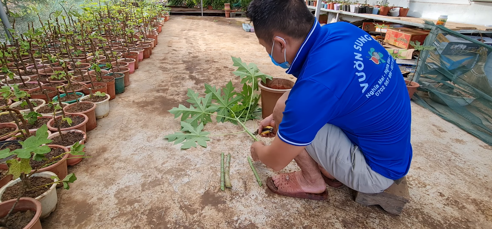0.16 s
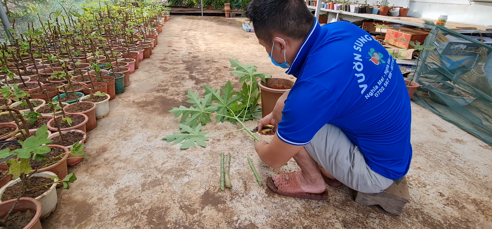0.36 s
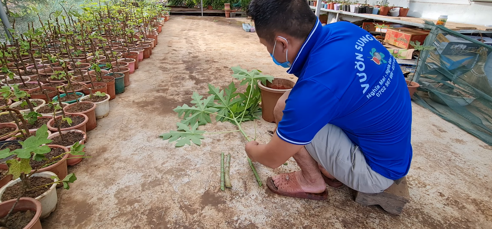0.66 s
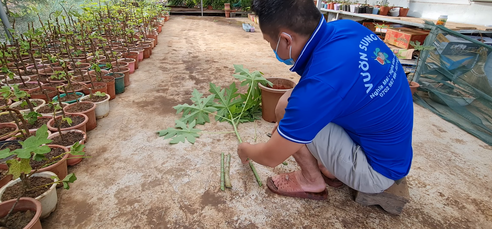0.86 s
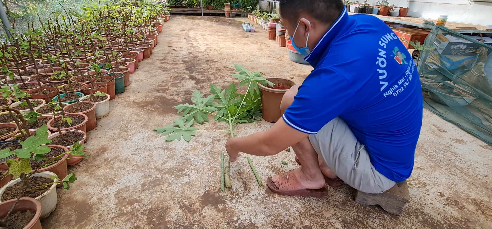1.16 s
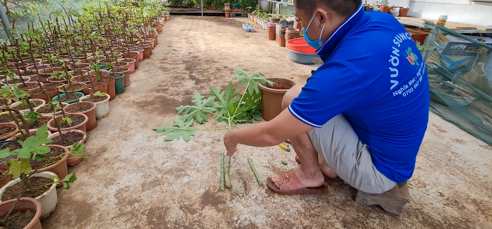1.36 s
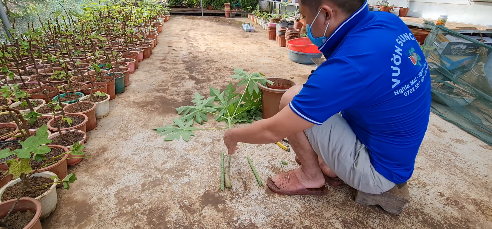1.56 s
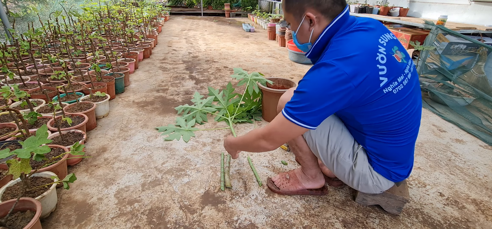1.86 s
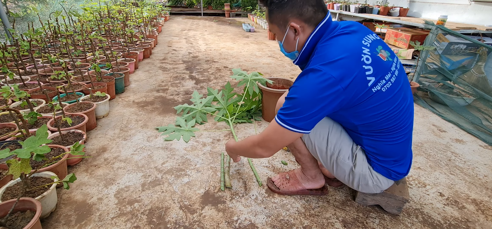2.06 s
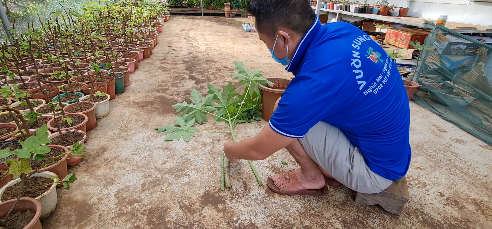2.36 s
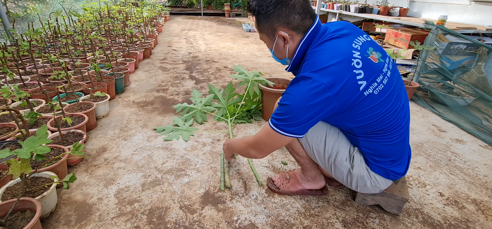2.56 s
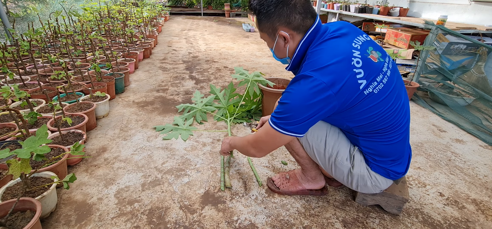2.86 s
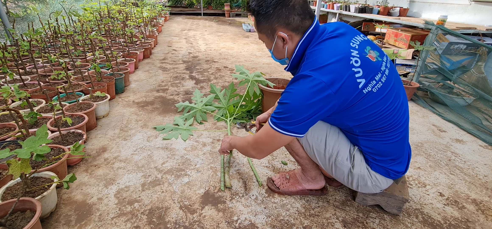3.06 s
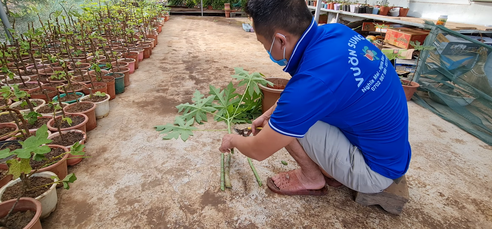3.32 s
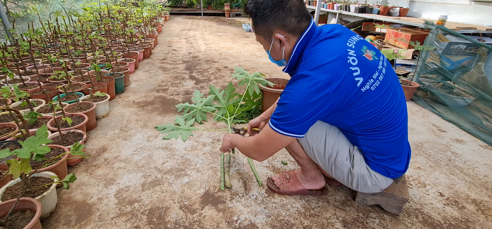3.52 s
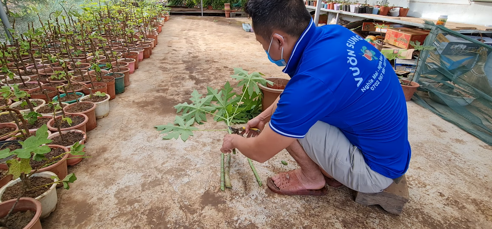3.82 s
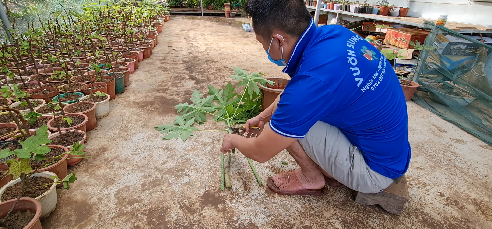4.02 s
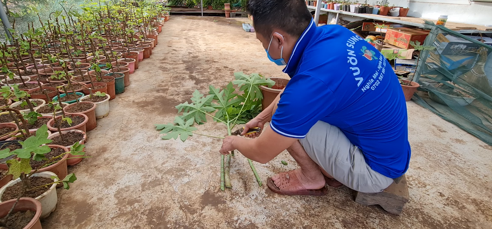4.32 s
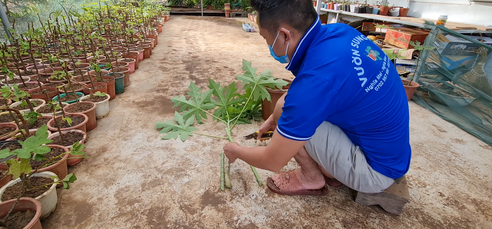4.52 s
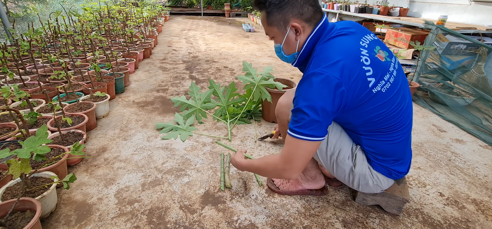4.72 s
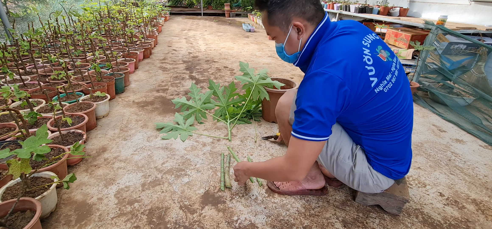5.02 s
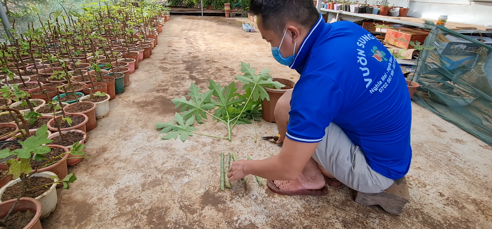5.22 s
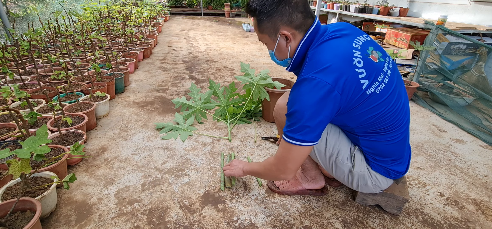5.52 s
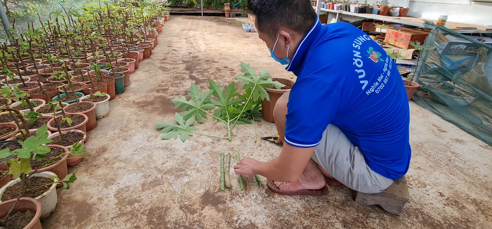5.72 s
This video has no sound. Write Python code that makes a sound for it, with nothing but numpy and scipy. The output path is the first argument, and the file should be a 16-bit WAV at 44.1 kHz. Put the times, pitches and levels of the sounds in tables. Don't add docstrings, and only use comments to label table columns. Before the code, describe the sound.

Pruning shears clatter onto concrete, light metallic ticks and stem rustles follow, then one sharp snip cuts a green stem amid quiet nursery ambience.

```python
import sys
import numpy as np
from scipy import signal
from scipy.fft import irfft
from scipy.io import wavfile
from scipy.ndimage import uniform_filter1d

SR = 44100
rng = np.random.default_rng(int(sys.argv[2]) if len(sys.argv) > 2 else 0)


def ratio(d):
    e = np.asarray(d, float) / 20
    return 10 ** e


def store_wav(level_fs):
    pcm = np.round(np.clip(np.atleast_2d(level_fs), -1, 1) * 32767)
    wavfile.write(sys.argv[1], SR, pcm.T.astype(np.int16))


N = 259308

# start in seconds, peak in dB, rise in seconds, crack in dB, room in dB.
BOUNCES = [
    (0.734, -31, 0.002, -8, 0),
    (0.771, -13.5, 0.0019, -7, 0.5),
    (0.827, -9, 0.002, -6.5, -2),
    (0.921, -16.5, 0.002, -3, -0.5),
]
# frequency in Hz, level in dB per Hz.
BOUNCE_COLOURS = [
    [(120, -42), (200, -8.5), (1040, -13.5), (1370, -8), (1940, -10), (2750, -3), (3760, -17), (4770, -9.5),
     (8270, -16.5), (16000, -33.5)],
    [(120, -55.5), (200, -31.5), (311, -14.5), (548, -20), (671, -9), (1020, -16), (1980, -11.5),
     (2960, 1.5), (3490, -14.5), (5420, -3.5), (7270, -15.5), (12400, -23.5), (16000, -42.5)],
    [(71, -46.5), (120, -18.5), (295, -15), (362, -18.5), (546, -27.5), (742, -4.5), (856, -7.5),
     (1140, -2.5), (1940, -7.5), (3310, -8), (3740, -14), (4140, -13), (7500, -20), (12300, -25),
     (16000, -30.5)],
    [(88, -50.5), (150, -36), (309, -8.5), (398, -23), (774, -0.5), (1480, -7), (1600, 0), (2270, -11),
     (2760, -7), (3770, -19.5), (7180, -12.5), (9260, -22.5), (16000, -25.5)],
]
# start in seconds, peak in dB, rise in seconds, room in dB.
SNIP_EVENT = (4.2694, -2.5, .0019, -2.5)
# frequency in Hz, level in dB per Hz.
SNIP_COLOUR = [(59, -56), (100, -26), (550, -22), (918, -26.5), (1380, -11.5), (1700, -26), (1850, -11),
               (2200, -11.5), (2900, 1), (4080, -9.5), (4440, 2.5), (5860, 2), (9980, -16), (15000, -11),
               (16300, -16)]
# frequency in Hz, decay t60 in seconds, level in dB.
BLADE_RINGS = [(4400, .0045, 2.0), (6000, .012, -3.5)]
# time in seconds, level in dB.
CRUSH_LEVEL = [
    (4.205, -72.5),
    (4.217, -55.5),
    (4.23, -44),
    (4.255, -43),
    (4.262, -51),
    (4.268, -37),
]
# frequency in Hz, level in dB per Hz.
FIBRE_COLOUR = [(180, -58), (300, -28), (967, -7.5), (1100, -6), (1450, -7), (1620, -6), (3070, -2.5),
                (4130, -12), (6490, -10), (12500, -31), (16200, -52), (22000, -120)]
# start in seconds, peak in dB, strongest ring in Hz,
# thump share in dB, fizz share in dB.
LIGHT_TAPS = [(1.65, -68, 520, 2, -16), (1.933, -54.5, 1200, -10, -36), (2.07, -58.5, 1210, -3, -25),
              (2.155, -44, 2800, -4, -31), (2.228, -54, 4600, -14, -10), (2.251, -43, 1200, 1, -23),
              (2.308, -54, 770, 0, -19), (2.367, -38, 3500, -26, -8), (2.547, -31, 1900, -21, -20),
              (2.575, -32, 6610, -40, -17), (2.771, -55, 3450, -31, -26), (2.999, -60, 4720, -10, -16),
              (3.605, -47, 1520, -6, -16.5), (4.216, -38, 2200, -18, -30), (4.473, -42, 3100, -38.5, -3),
              (4.777, -48, 1700, -25, -22), (4.789, -51, 6160, -15, -16), (4.822, -47, 1590, -29, -18)]
# frequency in Hz, decay t60 in seconds, level in dB.
STEEL_RINGS = [(800, 0.024, -4), (1200, .012, -7.5), (1700, .01, 0), (2960, 0.004, 0.5), (4300, .008, -3),
               (6360, 0.0047, 1.5)]
# start in seconds, length in seconds, peak in dB,
# centre in Hz, hiss share in dB.
STROKES = [(0.0, .045, -65, 2200, -1), (.09, .2, -76, 950, 2), (.29, .11, -72, 1500, -2),
           (.435, .17, -63, 1700, -2), (.55, .2, -69, 2100, 3), (1.095, .26, -53, 1500, -20),
           (1.3, .2, -88, 1250, 12), (1.62, .2, -75, 800, -14), (1.82, .16, -80, 1200, 3),
           (2.01, .12, -73, 850, -12), (2.11, .2, -66, 950, -22), (2.19, .13, -72, 1040, 5),
           (2.32, .05, -70, 1050, 2), (2.96, .16, -74, 1135, -9), (4.77, .15, -74, 1560, -14)]
# start in seconds, peak in dB, pitch in Hz.
STEM_LANDINGS = [
    (2.18, -58, 340),
    (4.584, -48.5, 315),
    (5.59, -61.5, 250),
    (5.643, -54, 480),
    (5.701, -59, 600),
    (5.752, -54, 553),
]
# start in seconds, peak in dB, pitch in Hz.
POT_PINGS = [
    (5.5898, -75, 1990),
    (5.655, -67.5, 1956),
    (5.751, -58.5, 1975),
]
# delay in seconds, level in dB.
GROUND_ECHO = (.0036, -10.5)
# delay in seconds, level over the tail in dB, spread in seconds.
ROOF_ECHO = (.013, 3.9, .006)
# frequency in Hz, t60 in seconds.
SHED_DECAY = [(250, 0.2), (700, 0.22), (1700, 0.32), (4600, 0.31), (8000, .32), (14000, .28)]
# frequency in Hz, lead of the left port in radians.
PORT_LEAD = [(100, -.2), (1000, -.9), (3000, -1.1), (6000, -1.3), (16000, -1.4)]
# frequency in Hz, width in Hz, throbs per second, throb depth,
# left minus right in dB; then loudest level in dB, swell in dB, period in seconds, first top in seconds.
INSECT_SINGERS = [
    ((4720, 290, 25, .25, -1), (-80, 14, .93, .36)),
    ((7680, 380, 397, .4, 4), (-83, 9, .87, .55)),
    ((8100, 300, 397, .4, 4), (-86, 12, .85, .1)),
    ((5530, 15, 75, 2.5, -1), (-95, 10, 9, 4.2)),
]
# frequency in Hz, width in Hz, level in dB.
PUMP = (70, 12, -71.5)
# time in seconds, firing rate in Hz, level in dB.
FAR_ENGINE = [(0.0, 97, -78), (.6, 107, -69), (.9, 120, -71), (1.1, 108, -76), (1.7, 117, -76),
              (2.1, 125, -73), (2.35, 131, -65), (2.7, 117, -71), (3.1, 120, -70), (3.4, 108, -79),
              (4.0, 106, -83), (5.88, 112, -78)]
# time in seconds, pitch in Hz, level in dB.
COO = [
    (2.41, 746.2, -78.5),
    (2.502, 768.2, -74),
    (2.58, 762.8, -66),
    (2.654, 763.7, -78),
    (2.722, 752.0, -69.5),
    (2.828, 707.6, -82),
    (2.87, 749.2, -89.5),
]
# start in seconds, length in seconds, pitch in Hz, level in dB.
BLURRED_CALLS = [(.521, .151, 2121, -71), (1.401, .121, 3401, -79), (1.641, .181, 531, -77),
                 (2.901, .141, 501, -81), (3.061, .101, 691, -77), (3.601, .101, 521, -77),
                 (3.761, .101, 2901, -77), (4.701, .501, 751, -85), (4.781, .161, 296, -75),
                 (4.981, .181, 581, -75), (5.021, .121, 1511, -81), (5.271, .101, 731, -77),
                 (5.401, .181, 741, -83), (5.531, .111, 1401, -81), (5.751, .101, 1402, -83)]
# frequency in Hz, level in dB per Hz.
AIR_COLOUR = [(22, -24), (42, -3), (110, -7), (170, -12), (452, -16), (583, -13), (1020, -20.5),
              (2890, -21.5), (3940, -23.5), (4790, -22.5), (6530, -28), (7950, -23), (9410, -49.5),
              (10800, -39), (15200, -46.5), (16500, -52)]
# frequency in Hz, likeness from -1 to 1.
PORT_LIKENESS = [(60, 0.72), (180, 0.78), (550, -0.068), (1650, 0.025), (4970, -0.16), (15000, -0.01)]
# frequency in Hz, left minus right in dB.
AIR_BALANCE = [(60, -4.5), (240, -2.5), (950, -1), (3770, -3.5), (15000, 5.5)]
# frequency in Hz, level in dB.
HOUSING_DIP = [(3000, 0.5), (3500, -2), (4000, -5), (4400, -2.5), (4700, 0)]


def blow(row, colour, modes=()):
    start, peak_db, rise_s, crack_db, room_db = row
    out = []
    for push in contact(rise_s, crack_db):
        rings = sum(ratio(db) * evened(resonate(push, hz, 2.2 / t60)) for hz, t60, db in modes)
        out.append(evened(evened(coloured(push, colour)) + rings))
    return start, ratio([[peak_db], [peak_db + room_db]]) * out / abs(out[0]).max()


def snip():
    start, peak_db, rise_s, room_db = SNIP_EVENT
    crack_db = -3.0
    return blow((start, peak_db, rise_s, crack_db, room_db), SNIP_COLOUR, BLADE_RINGS)


def crush():
    s, db = np.transpose(CRUSH_LEVEL)
    t = np.arange(s[0], s[-1], 1 / SR)
    cracks = coloured(grit(len(t), 11000, 2.8), FIBRE_COLOUR)
    return s[0], ratio(np.interp(t, s, db)) * evened(cracks)


def tap(start, peak_db, ring_hz, thump_db, fizz_db):
    rise_s, crack_db, room_db = 0.0018, -5.5, 1.0
    steel_db, ring_db, ring_s = -3.5, -6, 0.0089
    shade = [(60, thump_db - 32), (450, thump_db - 11), (800, thump_db),
             (3000, -14), (8500, fizz_db - 1), (16000, fizz_db - 16)]
    out = []
    for push in contact(rise_s, crack_db):
        steel = sum(ratio(db) * evened(resonate(push, hz, 1.3 / t60)) for hz, t60, db in STEEL_RINGS)
        broad = coloured(evened(push) + ratio(steel_db) * evened(steel), shade)
        ring = resonate(push, ring_hz, 2.14 / ring_s)
        out.append(evened(evened(broad) + ratio(ring_db) * evened(ring)))
    return start, ratio([[peak_db], [peak_db + room_db]]) * out / abs(out[0]).max()


def drag(start, length, peak_db, hz, hiss_db):
    rise_share, edge_db, room_db = 0.45, -18, -5
    u = np.arange(round(length * SR)) / (length * SR)
    off_peak = np.where(u < rise_share, 1 - u / rise_share, (u - rise_share) / (1 - rise_share))
    grains = resonate(resonate(grit(len(u), 2600, 2.8), hz, 1100), hz, 1500)
    scrape = coloured(grains, [(120, -21), (300, -6.5), (750, -1), (2200, -6), (3500, -7), (6000, -20)])
    hiss = coloured(grit(len(u), 14000, 2.25), [(2000, -26), (4500, 3), (9000, -4.5), (16000, -13)])
    stroke = ratio(peak_db + edge_db * off_peak ** 2) * signal.windows.tukey(len(u), 0.08)
    return start, (evened(scrape) + ratio(hiss_db) * evened(hiss)) * stroke * ratio([[0], [room_db]])


def thud(start, peak_db, hz):
    t = np.arange(3000) / SR / 0.0034
    push = rng.standard_normal(3000) * t * np.exp(-t)
    puff = coloured(push, [(40, -22), (170, -7), (hz, 0), (1.8 * hz, -12), (2500, -55)])
    return start, peaked(puff, peak_db) * ratio([[0], [-2.5]])


def pot_ping(start, peak_db, hz):
    t60, push_s, room_db = 0.027, 0.0032, -5
    t = np.arange(4000) / SR / push_s
    push = (0.59 + rng.standard_normal(4000)) * t * np.exp(-t)
    ring = resonate(resonate(push, hz, 1.9 / t60), hz, 1.6 / t60)
    return start, peaked(ring, peak_db) * ratio([[0], [room_db]])


def shed(direct, feed):
    tail_db, count = -3.5, SR // 2
    taps = np.zeros((2, count))
    at = np.arange(0, count - 6, 6) + rng.integers(0, 6, (2, (count - 1) // 6))
    np.put_along_axis(taps, at, rng.standard_normal(at.shape), 1)
    taps[1] += 0.28 * taps[0]
    hz, t, z = signal.stft(taps, SR, nperseg=128)
    decay = ratio(-60 * t / read(SHED_DECAY, hz)[:, None])
    tail = signal.istft(z * decay, SR, nperseg=128)[1][:, :count]

    roof_s, roof_db, spread_s = ROOF_ECHO
    late = np.arange(count) / SR - roof_s
    after = 1 + (ratio(roof_db) - 1) * np.exp(-abs(late) / spread_s)
    tail *= np.where(late < 0, np.exp(late / 0.009), after)
    tail *= ratio(tail_db) / np.linalg.norm(tail, axis=1, keepdims=True)

    ground_s, ground_db = GROUND_ECHO
    hz = np.fft.rfftfreq(1024, 1 / SR)
    lead = np.exp(0.5j * np.multiply.outer([1, -1], read(PORT_LEAD, hz)))
    bounce = ratio(ground_db) * np.exp(-2j * np.pi * hz * ground_s) * lead[::-1]
    early = np.roll(irfft(lead + bounce), 64, axis=1)
    near = signal.fftconvolve(direct[None], early, axes=1)[:, 64:N + 64]
    return near + signal.fftconvolve(feed[None], tail, axes=1)[:, :N]


def insects():
    t, out = np.arange(N) / SR, np.zeros((2, N))
    for (hz, width, per_s, depth, pan_db), (db, swell_db, period, top) in INSECT_SINGERS:
        throb = 1 + depth * np.sin(2 * np.pi * per_s * t)
        phrase = ratio(db - swell_db * np.sin(np.pi * (t - top) / period) ** 2)
        alike = narrow(hz, width) * ratio([[pan_db / 2], [-pan_db / 2]])
        unlike = narrow(hz, width) * np.array([[1], [-1]])
        out += phrase * throb * (alike + 0.6 * unlike)
    return out


def hum():
    t, (s, hz, db) = np.arange(N) / SR, np.transpose(FAR_ENGINE)
    engine = ratio(np.interp(t, s, db)) * narrow(np.interp(t, s, hz), 6)
    pump_hz, pump_width, pump_db = PUMP
    return (ratio(pump_db) * narrow(pump_hz, pump_width) + engine) * ratio([[-1.2], [1.2]])


def fowl():
    out, (s, hz, db) = np.zeros(N), np.transpose(COO)
    t = np.arange(s[0], s[-1], 1 / SR)
    note = np.sin(2 * np.pi * np.cumsum(np.interp(t, s, hz)) / SR) * signal.windows.tukey(len(t), 0.1)
    add(out, s[0], np.sqrt(2) * ratio(np.interp(t, s, db)) * note)
    for start, length, hz, db in BLURRED_CALLS:
        noise = rng.standard_normal(round(length * SR))
        call = evened(resonate(noise, hz, 12 + 0.012 * hz))
        add(out, start, ratio(db) * call * signal.windows.tukey(len(noise), 0.5))
    return out * ratio([[-1.5], [1.5]])


def air():
    level_db = -69
    frames, hz = N // 256 + 5, np.fft.rfftfreq(1024, 1 / SR)
    a, b, c, d, patches = rng.standard_normal((frames, 513, 5)).T
    patches = evened(uniform_filter1d(uniform_filter1d(patches, 8, 0), 16, 1))
    same = np.clip(read(PORT_LIKENESS, hz), -1, 1)[:, None]
    left, other = a + 1j * b, c + 1j * d
    z = np.array([left, same * left + np.sqrt(1 - same ** 2) * other])
    balance = np.multiply.outer([0.5, -0.5], read(AIR_BALANCE, hz))[..., None]
    z *= ratio(read(AIR_COLOUR, hz)[:, None] + 0.7 * patches + balance)
    return ratio(level_db) * evened(signal.istft(z, nperseg=1024, noverlap=768)[1][:, :N])


def contact(rise_s, crack_db):
    t = np.arange(3000) / SR / rise_s
    rub = rng.standard_normal(len(t)) * t ** 2 * np.exp(-2 * t)
    crack = np.sinc(t * rise_s * SR - rise_s * SR) * (abs(t - 1) < 1)
    both = rub / np.linalg.norm(rub) + ratio(crack_db) * crack
    return np.array([both, crack * np.hypot(1, ratio(crack_db))])


def grit(count, per_s, spread_db):
    n = SR // 2
    size, chance, sign = rng.exponential(1, n), rng.random(n), rng.standard_normal(n)
    clicks = ratio(spread_db * np.minimum(size, 4)) * (chance < per_s / SR) * sign
    return evened(clicks[:count])


def narrow(hz, width):
    return evened(resonate(resonate(rng.standard_normal(N), hz, width), hz, width))


def resonate(x, hz, width):
    turn = np.exp(2j * np.pi * np.cumsum(hz * np.ones(len(x))) / SR)
    r = np.exp(-np.pi * width / SR)
    return 2 * (turn * signal.lfilter([1 - r], [1, -r], x / turn + 1e-18)).real


def coloured(x, points):
    log_gain = np.log(ratio(read(points, abs(np.fft.fftfreq(4096, 1 / SR)))))
    response = np.fft.ifft(np.exp(np.conj(signal.hilbert(log_gain)))).real[:1024]
    return signal.oaconvolve(x, response)[:len(x)]


def read(points, hz):
    f, value = np.transpose(points)
    return np.interp(np.log(hz + 1), np.log(f + 1), value)


def evened(x):
    return x / np.sqrt(np.mean(x ** 2) + 1e-20)


def peaked(x, db):
    return ratio(db) * x / abs(x).max()


def add(mix, start, sound):
    part = mix[..., round(start * SR):][..., :sound.shape[-1]]
    part += sound[..., :part.shape[-1]]


def scene():
    near = np.zeros((2, N))
    for row, colour in zip(BOUNCES, BOUNCE_COLOURS):
        add(near, *blow(row, colour))
    add(near, *snip())
    add(near, *crush())
    for source, rows in ((tap, LIGHT_TAPS), (drag, STROKES), (thud, STEM_LANDINGS), (pot_ping, POT_PINGS)):
        for row in rows:
            add(near, *source(*row))
    far = np.array([coloured(port, HOUSING_DIP) for port in air() + insects()])
    return shed(*near) + far + hum() + fowl()


def top_cut(x):
    return signal.sosfilt(signal.butter(12, 16810, fs=SR, output="sos"), x)


def record(dry):
    high_pass = signal.firwin(63, 6500, pass_zero=False, fs=SR)
    treble = signal.oaconvolve(dry, high_pass[None], "same")
    tilted = dry + treble * (ratio([[1.2], [-1.2]]) - 1)
    band_limit = signal.firwin(255, 16400, window=("kaiser", 9), fs=SR)
    limited = signal.oaconvolve(tilted, band_limit[None], "same")
    return top_cut(limited)


dry = scene()
out = record(dry)
store_wav(out)
```